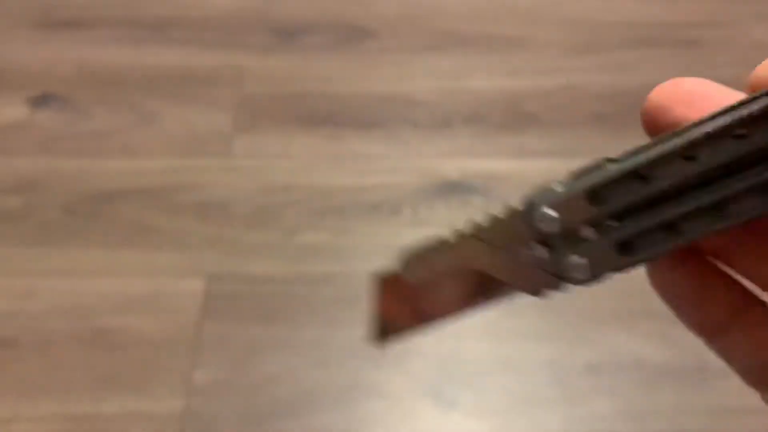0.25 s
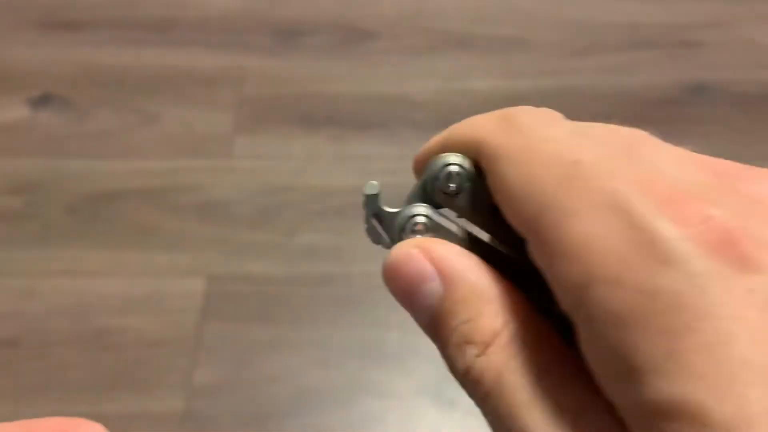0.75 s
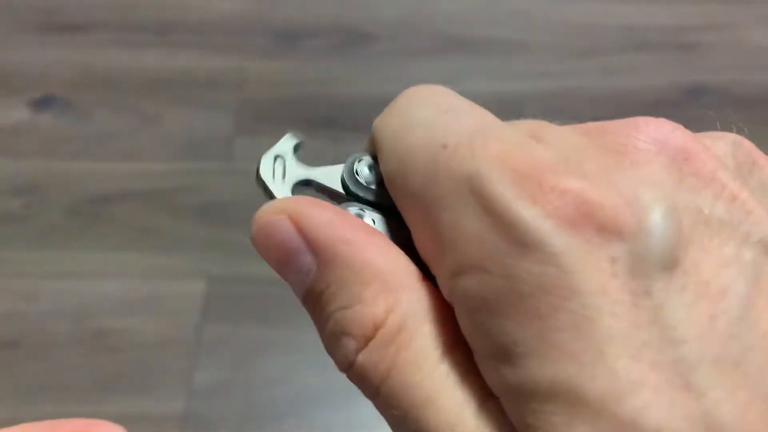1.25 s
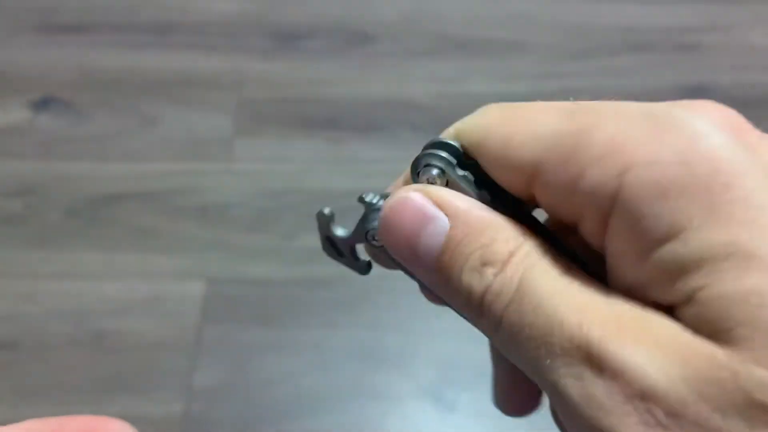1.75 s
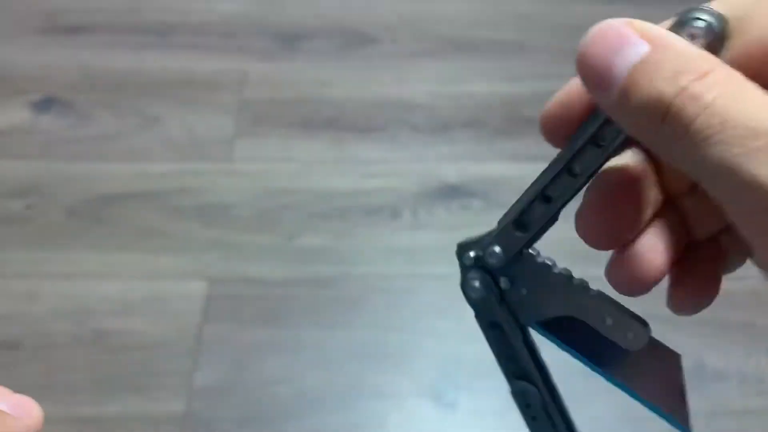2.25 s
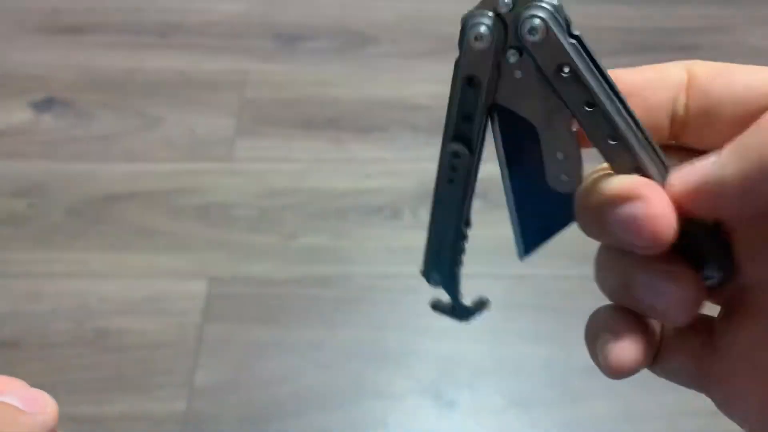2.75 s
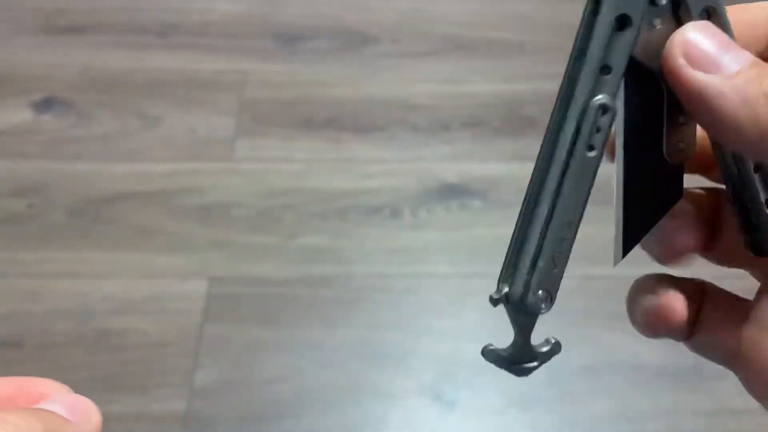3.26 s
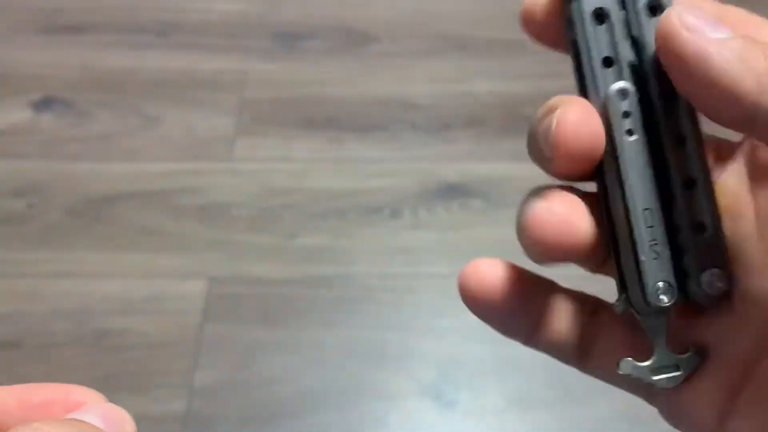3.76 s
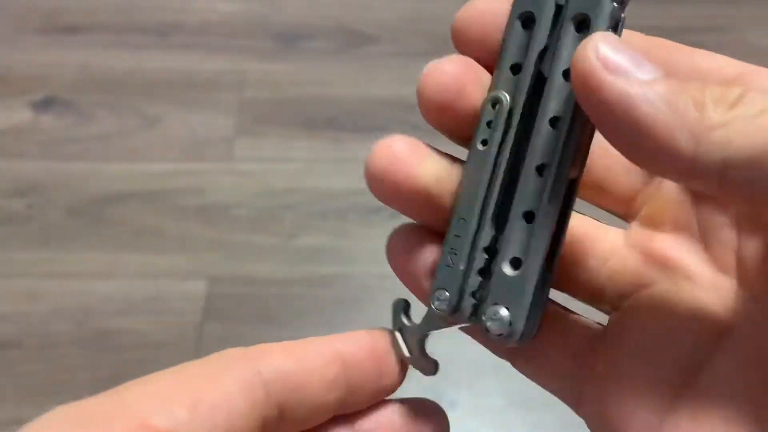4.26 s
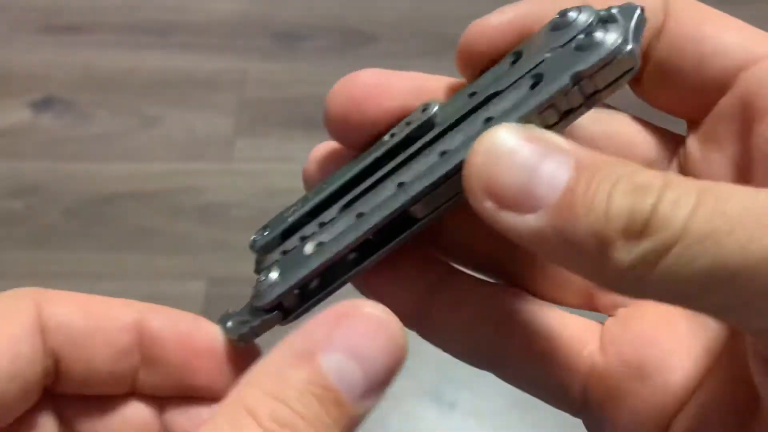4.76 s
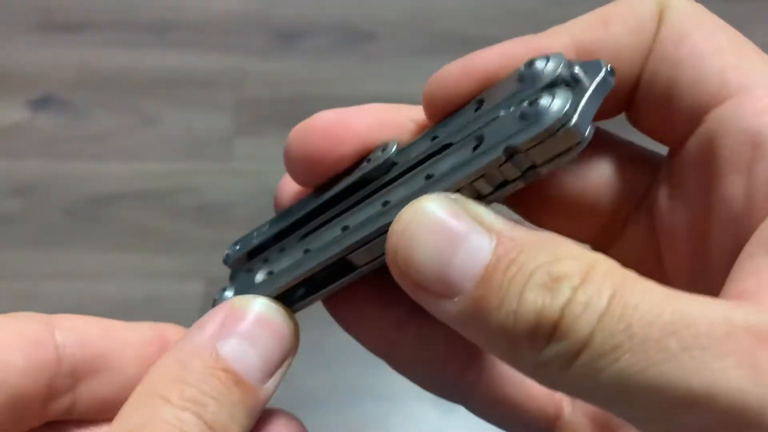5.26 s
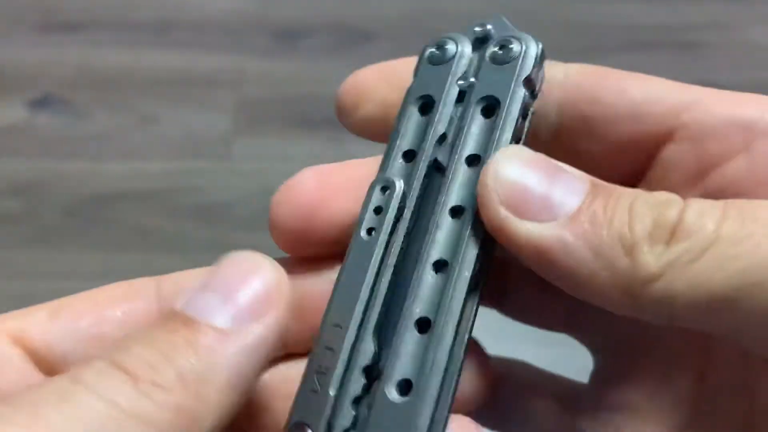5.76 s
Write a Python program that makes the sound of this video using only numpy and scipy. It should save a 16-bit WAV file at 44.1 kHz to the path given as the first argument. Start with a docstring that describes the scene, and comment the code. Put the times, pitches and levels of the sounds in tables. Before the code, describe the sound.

Close to a phone microphone, hands turn a small hinged metal knife. Light ticks come first, then a sharp clack, two quick clicks as the handles swing, sparse taps, and finally the loudest latch snap. Skin brushes faintly on metal between them. A quiet hard-floored room adds a short bright tail, with steady hiss and soft low rumble beneath.

```python
"""A quiet, hard-floored room, with a phone close to two hands turning over a small folding knife.
The metal handles and latch click and clack: each contact is a short noise force that rings damped modes.
Fingers rub the same metal in uneven slips, and the walls answer every touch with a fading noise tail.
The building rumbles as wavering noise, with low booming and one heavy thud of beating floor modes.
Steady microphone hiss lies underneath."""
import sys
import numpy as np
from scipy import signal
from scipy.fft import rfft, irfft, next_fast_len
from scipy.io import wavfile
from scipy.ndimage import uniform_filter1d, map_coordinates

SR = 44100
rng = np.random.default_rng(int(sys.argv[2]) if len(sys.argv) > 2 else 0)


def materialize(psi):
    """Save the field psi as 16-bit PCM at rate SR to the path in sys.argv[1].

    A 1-D psi becomes a single channel; in a 2-D psi each row is a channel.
    """
    bounded = np.clip(np.atleast_2d(psi).T, -1, 1)
    quanta = np.round(bounded * 32767).astype(np.int16)
    wavfile.write(sys.argv[1], SR, quanta)


N = 264732  # length in samples

# All levels in dB are relative.
# Slow level of the low booming: start_s, level_db
BOOM_LEVEL = [(0, -71), (1.2, -66.5), (2.1, -62), (2.6, -71.5), (4.9, -73.5), (5.15, -64.5), (6, -66.5)]
# Spectrum of the low booming: frequency_hz, density_db (per Hz)
BOOM_SPECTRUM = [(20, -19.5), (32, 11.5), (45, 14.5), (58, 12.5), (70, -50)]
# Slow level of the building rumble, before its waver: start_s, level_db
RUMBLE_LEVEL = [(0, -59), (1.0, -60), (1.4, -54.5), (1.9, -58), (2.7, -58), (3.0, -60), (3.3, -55.5),
                (3.9, -63.5), (4.2, -58.5), (4.8, -60.5), (5.2, -56.5), (6, -59.5)]
# Spectrum of the building rumble: frequency_hz, density_db (per Hz)
RUMBLE_SPECTRUM = [(18, -25), (30, -25), (54, 3), (97, -0.5), (129, -4), (140, -4), (155, -13.5), (184, -7),
                   (231, -19), (264, -11), (293, -24.5), (317, -24.5), (450, -41), (580, -62.5),
                   (990, -120)]
# Spectrum of the microphone hiss: frequency_hz, density_db (per Hz)
HISS_SPECTRUM = [(200, 5), (400, 10), (700, 6), (1200, 2), (2500, 0), (5000, -2.5), (6600, -4), (8200, -.5),
                 (11200, .5), (13500, -3.5), (15000, -6), (15500, -11), (15800, -45)]
# Left-right likeness of diffuse sound: frequency_hz, likeness (0 to 1)
LIKENESS = [(40, 0.94), (125, 0.91), (250, 0.81), (500, 1), (1000, 0.067)]
# Fingers sliding on the metal: start_s, length_s, level_db, brightness_db_per_octave,
# lower_hz, lower_db, upper_hz, upper_db, narrow_hz, narrow_db (three resonances of the spot)
RUBS = [(0.046, 0.04, -64, 6, 1950, 24, 8350, 14, 13200, 17.5),
        (0.577, 0.046, -60, -1, 2800, 2, 8100, 8, 4600, 2),
        (0.629, 0.1, -58, 0, 4670, 3, 7900, 9, 13200, 10),
        (1.59, 0.067, -60.5, 0.5, 3700, 4, 9600, 2, 13500, 5),
        (2.449, 0.37, -82, 2, 2000, 0, 10600, 28, 14000, 5),
        (2.99, 0.055, -66.5, -4.5, 3660, 5, 12400, 28, 2200, 3),
        (3.792, 0.038, -70, -1, 5000, 11, 9500, 19.5, 13500, 0),
        (4.204, 0.066, -59.5, -2, 3000, 9, 8460, 7, 13500, 0),
        (4.479, 0.15, -62, 2, 2800, 13, 9600, 1, 13500, -2),
        (5.202, 0.082, -51, 1, 3778, 5, 8150, 5, 13500, -3),
        (5.526, 0.068, -66.5, -0.5, 2660, 12, 12500, 11, 13500, 0),
        (5.916, 0.11, -66.5, 3.5, 5510, 13, 8680, 7, 13500, 3.5)]
# Contacts of metal on metal: start_s, level_db, brightness_db_per_octave,
# lower_hz, lower_db, upper_hz, upper_db, narrow_hz, narrow_db (three resonances of the spot),
# chatter_s, free_ringing_db, thump_db
CLICKS = [(0.065, -61, -6.5, 1950, 14, 8500, 2, 1960, 8.5, 0.01, -28, -63),
          (0.574, -44.5, -1, 2640, 9, 8300, 8.5, 3620, 9, 0.012, -25, -55),
          (.679, -59, -4, 1900, 11, 4750, 4, 1900, 9, .008, -15, -59),
          (.841, -67.5, -5, 5500, 27, 7800, 6, 2500, 0, .0065, -27, -60),
          (.9444, -70, -10.5, 2600, 10, 9200, 6, 2600, 7, 0.0054, -24, -60),
          (1.0053, -62, -4.5, 2620, 19, 8500, 12, 2600, 4.5, .0065, -28, -60),
          (1.067, -60, -2, 2640, 19, 9100, 11, 2650, 9, .0065, -30, -64.5),
          (1.133, -50, -2.5, 2330, 18, 8950, 1, 2600, -4, 0.0082, -16, -60),
          (1.177, -20, 0.5, 6540, 14, 13600, 19, 2600, 6, 0.0082, -33, -28),
          (1.287, -47.5, -3, 6450, 15, 9900, -3, 2600, 7, .0065, -25, -49.5),
          (1.621, -56, -1, 3900, 8, 9500, 3, 2600, 4, 0.0061, -22, -61),
          (1.698, -51, 2.5, 5180, 10, 9000, 14, 5000, 3, .005, -15, -60),
          (1.726, -30, 6, 1450, 20, 7600, 10.5, 2500, 9.5, 0.0097, -27, -42),
          (2.039, -55, 2.5, 3050, 3, 14000, 8, 5200, 0, .0065, -25, -62),
          (2.146, -22.5, 9, 2285, 14, 8550, 1.5, 2560, 9, 0.0058, -19.5, -65),
          (2.1561, -34, 3.5, 5350, 8, 14100, 2.5, 1000, 11, 0.0089, -14, -49),
          (2.308, -73, -1.5, 5330, 29, 9500, 5.5, 2600, 0, .0065, -27.5, -59),
          (2.758, -47, 1.5, 2240, 15.5, 10000, 11.5, 2250, 14.5, 0.011, -23, -65),
          (2.866, -61.5, -4.5, 2200, 21, 9500, 15, 2250, 3, .008, -29, -58),
          (2.978, -55.5, -2, 2260, 23.5, 8970, 9, 2250, 7, .008, -27, -57),
          (3.715, -32, 5, 5700, 16, 9900, 5.5, 2500, 1, 0.0095, -26.5, -46),
          (3.76, -45, 2.5, 5370, -3, 11800, 16.5, 2600, 2, .0065, -37, -60),
          (4.0505, -51, -3.5, 3480, 10, 9000, 13, 1650, 11, 0.011, -20, -56.5),
          (4.2475, -47, 2, 2930, 14, 8600, 5, 2600, 4, 0.0089, -44, -64),
          (4.576, -22.5, 9, 2860, 19.5, 10600, 6.5, 5500, 6.5, 0.0081, -32, -69),
          (4.8386, -60.5, -2, 4470, 17, 8640, 16, 2600, 6, .0065, -39, -68),
          (4.996, -17.5, 3, 6160, 10, 14000, 6.5, 2550, 10, 0.0049, -36, -51),
          (5.2581, 1, 6.5, 4840, 9.5, 10200, 1.5, 13900, 5, 0.0082, -35, -48)]
# Colour shared by all touches of the knife: frequency_hz, level_db
KNIFE_COLOUR = [(420, -31.5), (700, -27.5), (1250, -38), (1900, -34.5), (2700, -30), (3700, -27),
                (5000, -29.5), (7000, -24.5), (9500, -24), (12000, -25.5), (14200, -28)]
# Nominal modes of handles, blade and latch: pitch_hz
MODE_HZ = [750, 980, 1570, 1930, 2560, 3050, 3750, 4400, 5200, 5750, 6300, 7350, 8500, 9400, 9750, 10600,
           11100, 12200, 13200, 14140, 15200]
# Decay of each of those modes: level_db, held_t60_s, free_extra_db, free_t60_s
MODE_DECAY = [(-0.5, 0.0076, -2, 0.041), (1, 0.0049, -1.5, 0.033), (2, 0.0021, -6.5, 0.032),
              (-0.5, 0.017, -8.5, 0.063), (1, 0.007, 5, 0.11), (2.5, 0.0062, -3, 0.078),
              (-1.5, 0.007, 1.5, .17), (-4, 0.0058, -4.5, 0.35), (5.5, 0.0043, -10, .1),
              (-2.5, 0.0067, -7.5, 0.17), (1, 0.0038, -9, 0.15), (1, 0.0073, -3.5, 0.16),
              (0.5, 0.0057, -3, 0.11), (-0.5, 0.0018, -7.5, 0.057), (4, 0.0023, -11, 0.15),
              (-3.5, 0.0024, -10, 0.24), (1, 0.0037, -7.5, 0.099), (1, 0.011, -2.5, 0.088),
              (2.5, 0.0025, -2, 0.082), (-1.5, 0.0065, 2, .2), (0, 0.0017, 2.5, 0.078)]
# Low push of a blow caught by the hand: pitch_hz, level_db, t60_s
PALM_MODES = [(62.4, 11, .1), (120.5, 10, 0.045), (194, 3.5, 0.18), (225, 10, 0.064), (300, -12, 0.011),
              (610, -7.5, 0.074), (714, -6.5, 0.091)]
# The room's answer: frequency_hz, t60_s, level_db
ROOM = [(100, 0.24, -25.5), (300, 0.34, 8.5), (1006, 0.37, 11.5), (2500, 0.37, 4.5), (3800, 0.45, 2.5),
        (6060, 0.38, -1.5), (9957, 0.37, -4.5), (13500, 0.23, -5), (15460, 0.27, -6.5), (16120, .2, -41)]
# Floor modes set going by the thud: pitch_hz, level_db, t60_s
FLOOR_MODES = [(44.84, 6, 0.74), (50.3, -2.5, 2.5), (32.27, -7, 3.3)]
# How much louder the knife is at the left microphone port than at the right: frequency_hz, difference_db
LEFT_OVER_RIGHT = [(400, 2), (1100, -0.5), (2400, 3), (3400, 4), (4800, -0.5), (6500, -1)]

COLOUR_HZ = np.geomspace(400, 16000, 80)  # frequencies where a touch's colour is worked out
PIVOT_HZ = 5000  # brightness tilts the colour about this frequency
LOWER_OCT, UPPER_OCT, NARROW_OCT = 0.24, 0.23, 0.12  # resonance widths, octaves
DETUNE = 0.008  # spread of the mode shifts that the grip makes, as a fraction of pitch
STEADY, FLUTTER_PER_S = 0.96, 240  # steady share of free ringing; random flutter points per second
PUSH_S = 0.0036  # time constant with which the hand takes up a blow
CLICK_ROOM_DB, RUB_ROOM_DB = -3.5, -6.5  # sends to the walls
PATCH_DB = 2  # unevenness of the walls' answer
WAVER_DB, WAVER_PER_S = 2.5, 4  # rumble waver: scale and random points per second
THUD_S = 1.28
SHARED_HZ = 6830  # around this frequency the right channel goes over to the left port
LAG_S = 1 / 4680  # left channel behind right
TOP_HZ = 17000  # band limit


def amp(db):
    """Gain of a level in dB."""
    return 10 ** (np.asarray(db) / 20)


def unit(x):
    """x at rms 1."""
    return x / np.sqrt(np.mean(x ** 2) + 1e-20)


def along(hz_points, values, hz):
    """Values joined on a log-frequency axis."""
    return np.interp(np.log(hz + 1), np.log(np.asarray(hz_points) + 1), values)


def filtered(x, response):
    """x times a complex response of frequency, padded so that the end does not wrap round."""
    size = next_fast_len(N + SR // 2)
    hz = np.fft.rfftfreq(size, 1 / SR)
    return irfft(rfft(x, size) * response(hz), size)[..., :N]


def decaying_modes(modes, t):
    """Sum of sine modes, each dying exponentially by 60 dB in its t60."""
    return sum(amp(db - 60 * t / t60) * np.sin(2 * np.pi * hz * t) for hz, db, t60 in modes)


def diffuse(spectrum):
    """Stereo noise of rms 1: the mix of mid and side sets how alike the ports are at each frequency."""
    def mid_and_side(hz):
        angle = np.arccos(np.clip(along(*np.transpose(LIKENESS), hz), -1, 1)) / 2
        density = amp(along(*np.transpose(spectrum), hz)) * (hz > 15)
        return density * np.array([np.cos(angle), np.sin(angle)])

    mid, side = filtered(rng.standard_normal((2, N)), mid_and_side)
    return unit(np.array([mid + side, mid - side]))


def background():
    """Diffuse noise: slow booming and wavering rumble of the building, under steady microphone hiss."""
    t = np.arange(N) / SR

    def level(rows):
        return amp(np.interp(t, *np.transpose(rows)))

    waver = map_coordinates(rng.standard_normal(100), [t * WAVER_PER_S])
    booming = level(BOOM_LEVEL) * diffuse(BOOM_SPECTRUM)
    rumble = level(RUMBLE_LEVEL) * amp(WAVER_DB * waver) * diffuse(RUMBLE_SPECTRUM)
    hiss = amp(-79) * diffuse(HISS_SPECTRUM)
    return booming + rumble + hiss


def colour(tilt_db, lower_hz, lower_db, upper_hz, upper_db, narrow_hz, narrow_db):
    """Colour of one touch in dB: the knife's own, tilted, with the spot's resonances added."""
    def bump(hz, octaves):
        return np.exp(-(np.log2(COLOUR_HZ / hz) / octaves) ** 2)

    own = along(*np.transpose(KNIFE_COLOUR), COLOUR_HZ)
    tilt = tilt_db * np.log2(COLOUR_HZ / PIVOT_HZ)
    broad = lower_db * bump(lower_hz, LOWER_OCT) + upper_db * bump(upper_hz, UPPER_OCT)
    return own + tilt + broad + narrow_db * bump(narrow_hz, NARROW_OCT)


def ringing(colour_db, free_db, scatter_db):
    """Modes die fast while held and slower when free; each reaches the ports at its own level and phase."""
    t = np.arange(SR // 4) / SR
    db, held_t60, extra_db, free_t60 = np.transpose(MODE_DECAY)[:, :, None]
    hz = np.c_[MODE_HZ]
    hz = hz * (1 + DETUNE * rng.standard_normal(hz.shape))
    # a fast random flutter roughens the free ringing
    knots = rng.standard_normal((len(MODE_DECAY), 90))
    flutter = np.array([np.interp(t * FLUTTER_PER_S, np.arange(len(k)), k) for k in knots])
    held = amp(-60 * t / held_t60)
    free = amp(free_db + extra_db - 60 * t / free_t60) * (STEADY + flutter) * (1 - t / t[-1])
    port_shape = (2, len(MODE_DECAY), 1)
    scatter = scatter_db * rng.standard_normal(port_shape)
    level = amp(db + along(COLOUR_HZ, colour_db, hz) + scatter)
    phase = 2 * np.pi * rng.random(port_shape)
    modes = level * (held + free) * np.sin(2 * np.pi * hz * t + phase)
    return np.sum(modes, axis=1) * (1 - np.exp(-t / 0.0001))


def walls():
    """A fresh noise tail: faint until the first walls answer, each frequency dying at its own speed."""
    hz, t, noise = signal.stft(rng.standard_normal((2, SR // 2)), SR, nperseg=256)
    room_hz, room_t60, room_db = np.transpose(ROOM)
    # uneven patches in frequency and time
    patches = uniform_filter1d(rng.standard_normal(noise.shape[1:]), size=3, axis=0)
    patches = unit(uniform_filter1d(patches, size=2, axis=1))
    level_db = along(room_hz, room_db, hz)[:, None]
    fade_db = 60 * t / along(room_hz, room_t60, hz)[:, None]
    shaped = noise * amp(PATCH_DB * patches + level_db - fade_db)
    tail = signal.istft(shaped, SR, nperseg=256)[1]
    since = np.arange(tail.shape[1]) / SR
    opening = np.clip((since - 0.0115) / 0.00022, 0.06, 1)
    return tail * opening / np.sqrt(SR)


def add(track, start_s, direct, into_room):
    """Places the direct sound together with the wall tail of what is sent into the room."""
    heard = signal.fftconvolve(into_room, walls(), axes=1)
    heard[:, :direct.shape[1]] += direct
    track[:, round(start_s * SR):][:, :heard.shape[1]] += heard


def rubs():
    """Skin drags on the metal in tiny uneven slips, and these set the modes ringing."""
    track = np.zeros((2, N + SR))
    for start_s, length_s, level_db, *spot in RUBS:
        n = round(length_s * SR)
        unevenness = amp(0.82 * rng.standard_normal(n))
        slips = rng.standard_normal(n) * unevenness * np.hanning(n) ** 0.5
        metal = ringing(colour(*spot), -32.5, scatter_db=3.5)
        sound = amp(level_db - 11.5) * signal.fftconvolve(metal, slips[None], axes=1)
        add(track, start_s, sound, amp(RUB_ROOM_DB) * sound)
    return track[:, :N]


def contact(chatter_s):
    """Hard contact: weak noise just before the sharp blow, then short chatter; the spectrum is evened out."""
    t = np.arange(SR // 40) / SR
    blow_s = 0.0014
    lead_in = 0.07 * (t < blow_s)
    blow = np.exp(-((t - blow_s) / 0.00035) ** 2)
    chatter = 0.6 * (t > blow_s) * amp(-18 * t / chatter_s - 40 * (t / chatter_s) ** 4)
    spectrum = rfft(rng.standard_normal((2, len(t))) * (lead_in + blow + chatter))
    even = spectrum / np.sqrt(uniform_filter1d(abs(spectrum) ** 2, size=25))
    return irfft(even, len(t)) * (t < 2 * chatter_s)  # abrupt end


def coloured(x, colour_db, size):
    """x in the colour of a contact, 0.46 ms late and faded out over its length."""
    hz = np.fft.rfftfreq(size, 1 / SR)
    response = amp(along(COLOUR_HZ, colour_db, hz)) * np.exp(-2j * np.pi * hz * 0.00046)
    return irfft(rfft(x, size) * response, size) * np.linspace(1, 0, size) ** 2


def clicks():
    """Each contact gives a broad snap, rings the metal modes and pushes the hand by its thump level."""
    track = np.zeros((2, N + SR))
    t = np.arange(SR // 6) / SR
    push = decaying_modes(PALM_MODES, t) * (1 - t / t[-1]) * (1 - np.exp(-t / PUSH_S))
    for start_s, level_db, *spot, chatter_s, free_db, thump_db in CLICKS:
        colour_db = colour(*spot)
        force = contact(chatter_s)
        metal = ringing(colour_db, free_db, scatter_db=0.5)
        ring = amp(7) * signal.fftconvolve(metal, force[:1], axes=1)[:, :len(t)]
        snap = amp(25) * coloured(force, colour_db, len(t))
        direct = ring + snap + amp(thump_db) * push
        # summed over all directions the snap is smooth, so the walls get a plain impulse
        smooth_snap = amp(37) * coloured([[1]], colour_db, len(t))
        all_sides = amp(-1) * ring + smooth_snap
        add(track, start_s, amp(level_db) * direct, amp(level_db + CLICK_ROOM_DB) * all_sides)
    return track[:, :N]


def thud():
    """A heavy thud in the building: the floor swings up and its low modes beat as they fade."""
    t = np.clip(np.arange(N) / SR - THUD_S, 0, None)
    return amp(-39.5) * (1 - np.exp(-t / 0.021)) * decaying_modes(FLOOR_MODES, t)


def scene():
    """Everything that reaches the two microphone ports, the knife balanced between them by frequency."""
    def balance(hz):
        return amp(along(*np.transpose(LEFT_OVER_RIGHT), hz) * np.array([[0.5], [-0.5]]))

    knife = filtered(rubs() + clicks(), balance)
    return background() + knife + thud()


def record(dry):
    """The phone rounds high peaks, shares the left port's treble, lags the left and limits the band."""
    dry = dry / (1 + abs(dry / 0.75) ** 3) ** (1 / 3)

    def turn(hz):
        return np.pi / 2 / (1 + np.exp((SHARED_HZ - hz) / 250))

    own_port = filtered(dry[1], lambda hz: np.cos(turn(hz)))
    shared_treble = filtered(dry[0], lambda hz: np.sin(turn(hz)))

    def lag_and_band(hz):
        # half the lag delays the left, half advances the right
        lag = np.exp(1j * np.pi * hz * LAG_S * np.array([[-1], [1]]))
        return np.clip((TOP_HZ - hz) / 600, 0, 1) ** 2 * lag

    return filtered(np.array([dry[0], own_port + shared_treble]), lag_and_band)


dry = scene()
out = record(dry)
materialize(out)
```